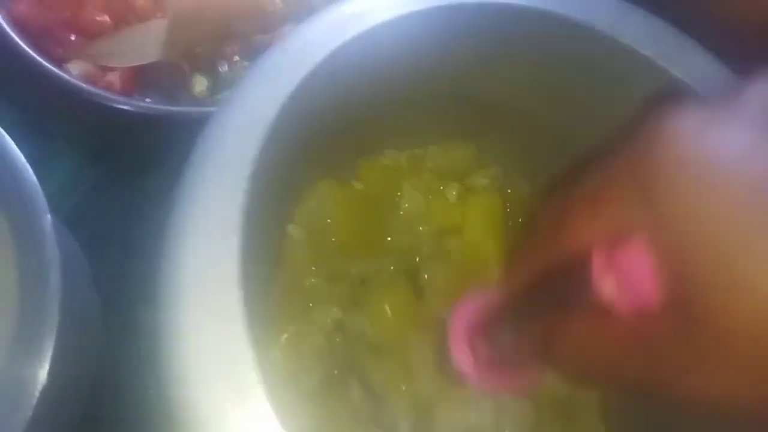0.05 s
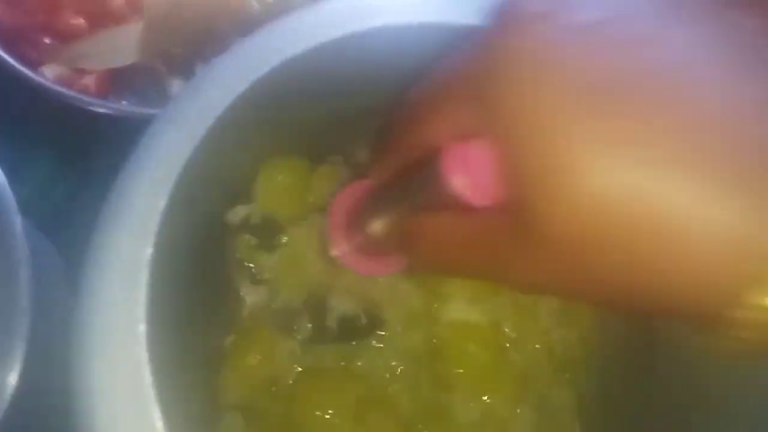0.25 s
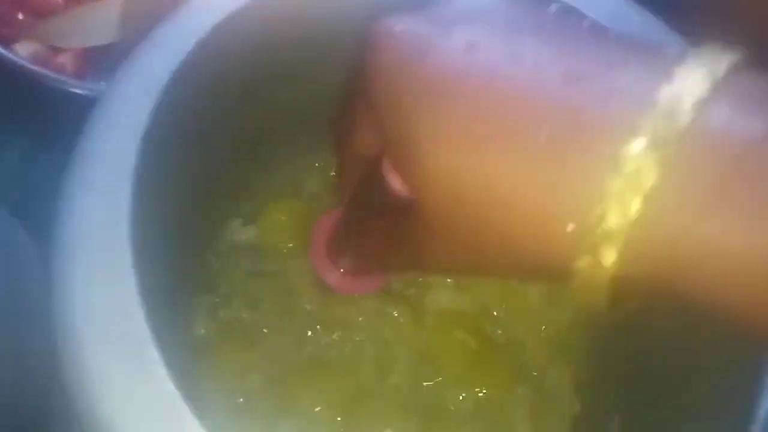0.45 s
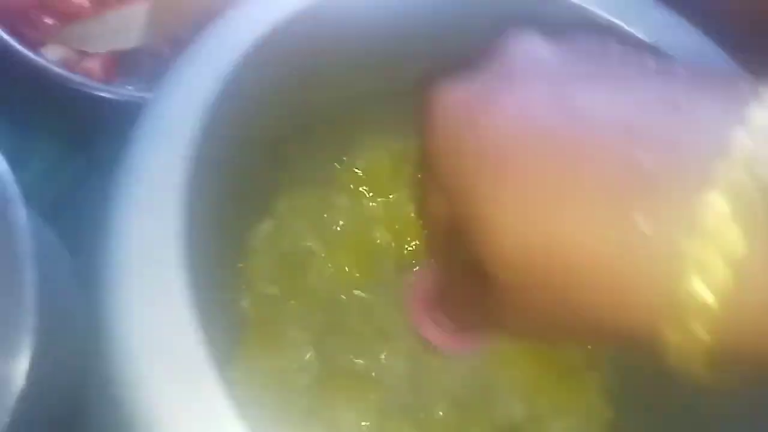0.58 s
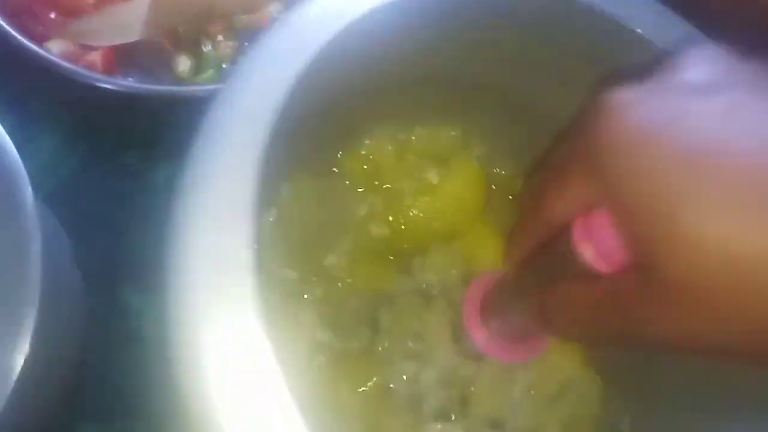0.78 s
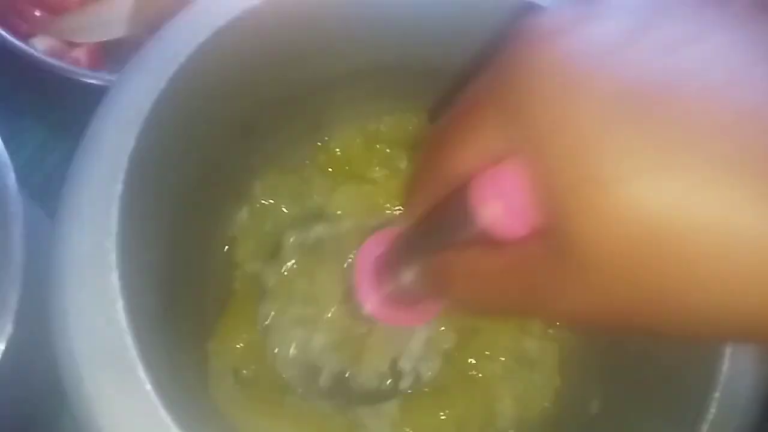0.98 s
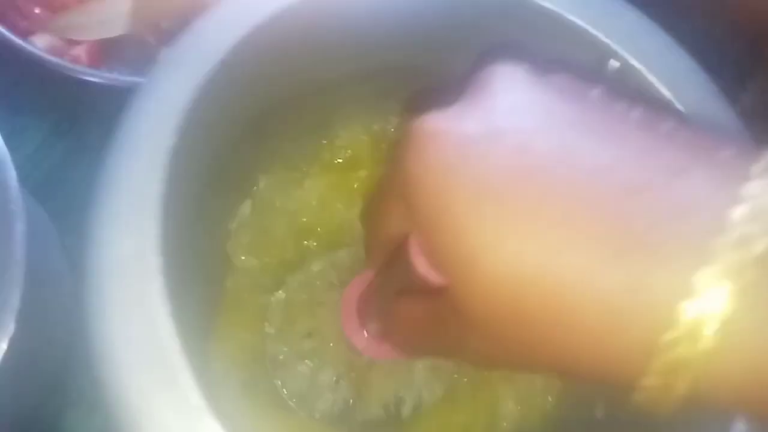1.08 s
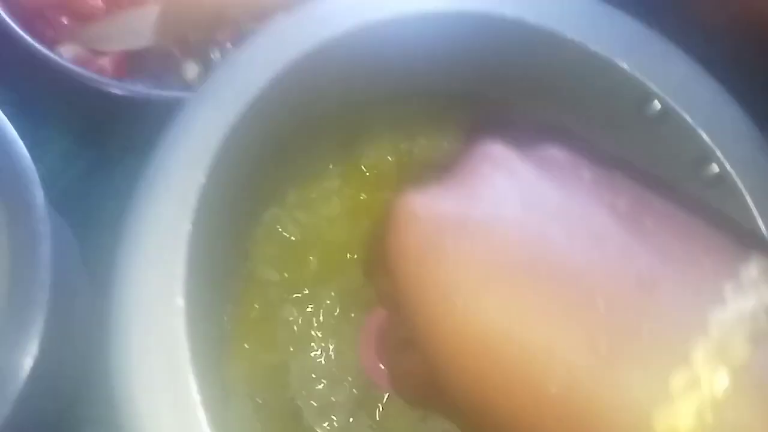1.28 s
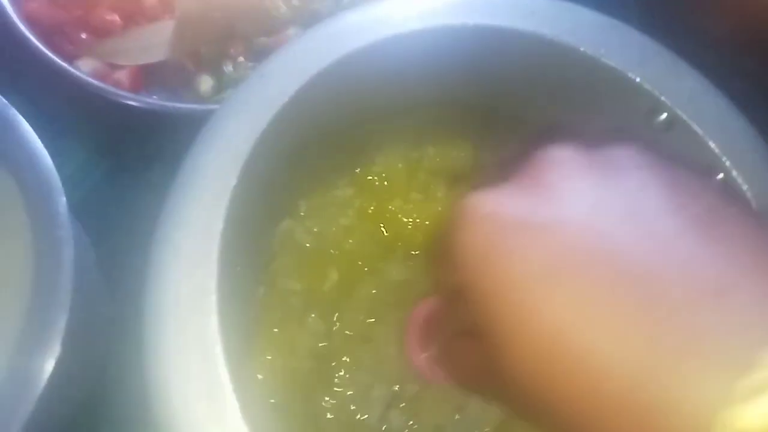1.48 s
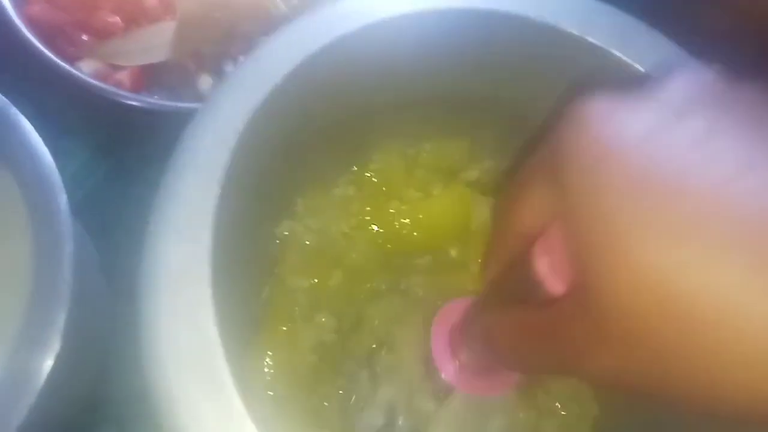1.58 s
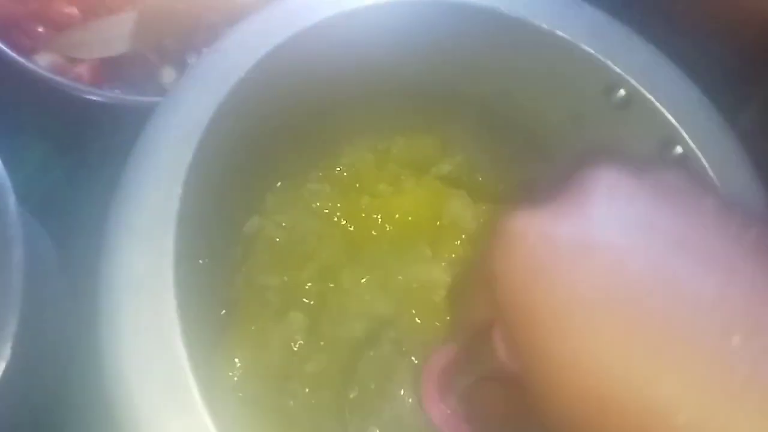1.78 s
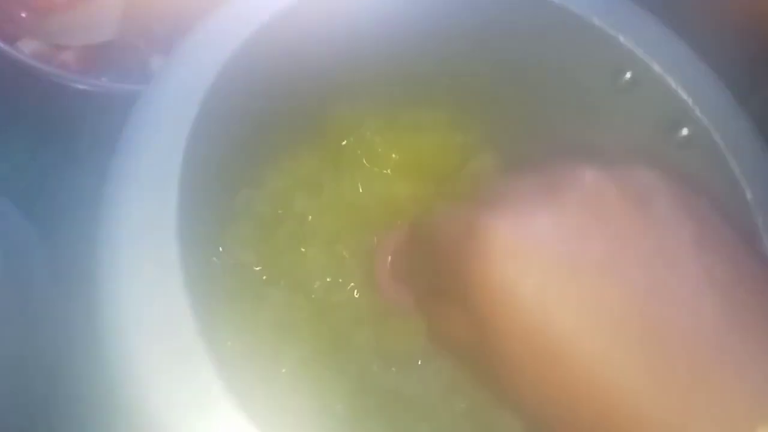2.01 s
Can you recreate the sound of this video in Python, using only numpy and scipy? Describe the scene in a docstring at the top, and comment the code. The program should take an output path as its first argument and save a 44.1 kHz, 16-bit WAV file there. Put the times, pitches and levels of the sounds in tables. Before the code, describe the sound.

A hand masher squelches through soft wet vegetables, knocking and ringing against a metal pot, heard close

```python
"""A hand masher works soft boiled vegetables in a metal pot, heard by a phone held close above it.
Its knocks and wet pops are noise and tone bursts; blows and scrapes drive resonances of the pot wall.
The rim rings on as two beating sines until the mash damps it; hollow notes, chinks and ticks join in.
A sizzling squelch of dense noise grains follows the strokes, over a low kitchen rumble."""
import sys
import numpy as np
from scipy import signal
from scipy.fft import rfft, irfft
from scipy.io import wavfile
from scipy.ndimage import uniform_filter1d

SR = 44100
rng = np.random.default_rng(int(sys.argv[2]) if len(sys.argv) > 2 else 0)


def dump_mix(stems):
    """Bounce the given channels to the path in sys.argv[1] as a 16-bit WAV at rate SR."""
    frames = np.atleast_2d(stems).T  # one column per channel
    limited = np.clip(frames, -1, 1)  # hard clip at full scale
    pcm = np.round(limited * 32767).astype(np.int16)
    wavfile.write(sys.argv[1], SR, pcm)


N = 90404


def undb(db):
    """dB to gain."""
    return 10 ** (np.asarray(db) / 20)


def fall(t, t60_s):
    """Decay by 60 dB in t60_s."""
    return np.exp(-np.log(1000) * np.maximum(t, 0) / max(t60_s, 1e-3))


def unit(x):
    """Scale to rms 1."""
    return x / np.sqrt(np.mean(x ** 2) + 1e-30)


def add(out, x, start_s):
    """Mix x into out at start_s."""
    i = max(int(start_s * SR), 0)
    out[i:i + len(x)] += x[:N - i]


def ring(x, hz, width_hz):
    """Two-pole resonance."""
    r = np.exp(-np.pi * width_hz / SR)
    poles = [1, -2 * r * np.cos(2 * np.pi * hz / SR), r * r]
    return signal.lfilter([1 - r, 0, r - 1], poles, x)


def steep(x, hz, width_hz):
    """Resonance applied twice, rms 1."""
    return unit(ring(ring(x, hz, width_hz), hz, width_hz))


def rough_tone(noise, hz, width_hz, tone_amp):
    """Sine plus narrow noise of rms 1 at the same frequency."""
    t = np.arange(len(noise)) / SR
    return tone_amp * np.sin(2 * np.pi * hz * t) + steep(noise, hz, width_hz)


def colour(x, table):
    """Minimum-phase filter with the gain curve of the table."""
    hz, db = np.array(table).T
    grid = np.log(np.linspace(1, SR / 2, 1025))
    # folding the cepstrum makes the filter causal
    cepstrum = irfft(np.interp(grid, np.log(hz), db) * np.log(10) / 20)
    cepstrum[1:1024] *= 2
    cepstrum[1025:] = 0
    return signal.fftconvolve(x, irfft(np.exp(rfft(cepstrum))))[:len(x)]


def walk(rate_hz):
    """Slewed random levels, rms 1."""
    k = int(SR / rate_hz)
    steps = np.repeat(rng.standard_normal(N // k + 1), k)
    return unit(uniform_filter1d(steps, k)[:N])


def kitchen():
    """Low kitchen rumble: noise through one broad resonance."""
    return undb(-77) * unit(ring(rng.standard_normal(N), 93, 150))


# mash stroke levels: (time [s], bass [dB], mid [dB], treble [dB], top [dB])
# each column acts by its deviation from its mean; the treble mean sets the overall level
SQUELCH_LEVELS = [(0, -41, -43.5, -52.5, -51), (0.069, -111, -51.5, -51.5, -58),
                  (.115, -75, -67.5, -56, -58), (0.151, -99.5, -42, -57, -60), (0.22, -85, -48.5, -56, -53),
                  (0.238, -52, -34.5, -39.5, -51), (.28, -50.5, -45.5, -37, -29.5),
                  (0.341, -75, -37.5, -49.5, -63), (0.392, -87, -55.5, -69, -57),
                  (0.442, -108, -48, -49, -69), (0.489, -90, -59.5, -70, -52),
                  (0.576, -88, -57, -62.5, -59.5), (.62, -60.5, -34.5, -50.5, -68),
                  (0.709, -64.5, -78, -76, -68), (0.748, -68.5, -43, -52.5, -56),
                  (.89, -61, -51.5, -54, -50.5), (0.991, -63, -49, -55, -50),
                  (1.036, -46.5, -47.5, -30.5, -31), (1.131, -62.5, -61, -59.5, -77),
                  (1.27, -93, -72.5, -65, -76), (1.294, -71, -57.5, -49.5, -52),
                  (1.362, -73.5, -62.5, -64, -71), (1.409, -73, -57, -50.5, -47.5),
                  (1.499, -53.5, -45, -51, -55.5), (1.54, -67.5, -47, -56.5, -57),
                  (1.57, -68, -56, -52.5, -45.5), (1.63, -90.5, -51.5, -47, -58),
                  (1.714, -60, -54, -59, -70), (1.747, -46, -37.5, -29.5, -39), (1.8, -70, -46, -46, -53.5),
                  (1.952, -94, -70, -68, -71), (2.001, -72.5, -43, -47.5, -52),
                  (2.05, -83, -54.5, -51, -64)]
# centres of those four columns: (frequency [Hz])
SQUELCH_HZ = (350, 1700, 6200, 12000)
# relative squelch spectrum: (frequency [Hz], density [dB per Hz])
SQUELCH_COLOUR = [(30, -39.5), (120, -22.5), (420, -15.5), (900, -6.5), (1400, -1), (2000, -5.5),
                  (2800, -10), (4200, -12.5), (5200, -1), (6800, 0), (8800, -10.5), (14800, -16.5),
                  (16000, -48)]
GRAINS_PER_S, GRAIN_CYCLES, GRAIN_SPREAD_DB = 550, 9.3, 2.2
FLICKER_DB, FLICKER_RATE_HZ = 2.5, 24.63
VALLEY_HZ, VALLEY_SWING = 3120, 0.67  # levels swing wider around here
BAND_STEP = 0.35  # natural log of frequency, half an octave


def squelch():
    """Dense tiny bursting grains in half-octave bands that follow the strokes and flicker."""
    t, rows, out = np.arange(N) / SR, np.array(SQUELCH_LEVELS), np.zeros(N)
    levels = np.array([np.interp(t, rows[:, 0], rows[:, k]) for k in range(1, 5)])
    deviation = levels - levels.mean(1, keepdims=True)
    spectrum = rfft(unit(colour(rng.standard_normal(N), SQUELCH_COLOUR)))
    log_hz = np.log(np.linspace(1, SR / 2, N // 2 + 1))
    for centre in np.arange(np.log(50), np.log(20000), BAND_STEP):
        band = irfft(spectrum * np.clip(1 - abs(log_hz - centre) / BAND_STEP, 0, 1), N)
        starts = rng.random(N) < GRAINS_PER_S / SR
        grains = starts * undb(GRAIN_SPREAD_DB * rng.exponential(size=N))
        decay = np.exp(-min(np.exp(centre), 3000) / GRAIN_CYCLES / SR)
        grain_env = 0.5 + unit(signal.lfilter([1], [1, -decay], grains))
        swing = 1 + VALLEY_SWING * np.exp(-8 * (centre - np.log(VALLEY_HZ)) ** 2)
        share = np.array([np.interp(centre, np.log(SQUELCH_HZ), e) for e in np.eye(4)])
        level_db = swing * share @ deviation + levels[2].mean()
        out += band * grain_env * undb(level_db + FLICKER_DB * walk(FLICKER_RATE_HZ))
    return out


def notes(table, tone_amp):
    """Short rough notes: narrow noise and a tone under a quick rise and a decay."""
    out, t = np.zeros(N), np.arange(SR // 2) / SR
    noises = rng.standard_normal((len(table), len(t)))
    for (start_s, hz, db, t60_s, width_hz), noise in zip(table, noises):
        env = np.minimum(t / 0.0006, 1) * fall(t, t60_s)
        add(out, undb(db) * env * rough_tone(noise, hz, width_hz, tone_amp), start_s)
    return out


# low pot notes: (time [s], frequency [Hz], level [dB], t60 [s], width [Hz])
HOLLOW_NOTES = [(.001, 418, -46.5, 0.17, 111), (.657, 421.6, -48, 0.2, 50), (.728, 724, -32.5, 0.025, 200),
                (.7425, 750, -26, 0.037, 507), (.7555, 429, -35, 0.15, 50.5),
                (1.0255, 1162, -22.5, 0.044, 120), (1.04, 1159, -39.5, 0.35, 257),
                (1.185, 1990, -66.5, 0.42, 60.4), (1.317, 1314, -52, 0.14, 200),
                (1.403, 1338, -42.5, 0.07, 200), (1.708, 1237, -30, 0.1, 200)]


def hollow():
    """Hollow low notes of the pot, as decaying rough tones."""
    return notes(HOLLOW_NOTES, 0.85)


# knocks and wet pops: (time [s], level [dB], low resonance [Hz], high resonance [Hz],
#   low level [dB], high level [dB], broad crack level [dB], t60 [s])
HIT_EVENTS = [(0.014, -33.5, 1770, 6650, -5, -16, -8, 0.03),
              (0.019, -31, 1830, 4350, -10, -6.5, -40, 0.034),
              (0.037, -32.5, 1410, 5400, -10, -29, -14.5, 0.062),
              (0.1212, -29.5, 1310, 6630, -13, -20, -26, 0.057),
              (0.151, -31, 2010, 6000, -10, -5, -15, 0.025),
              (0.1554, -23.5, 1860, 6960, -4.5, -15.5, -22, 0.021),
              (0.1756, -22, 2157, 5220, -9.5, -13, -12, 0.035),
              (0.205, -21, 1540, 6200, -13.5, -11, -32, 0.021),
              (0.224, -4, 1774, 5970, -7.5, -7, -22, 0.022),
              (0.251, -13.5, 1810, 7400, -6.5, -25, -46, 0.084),
              (0.275, -15, 2510, 5530, -19, -17, -35, 0.11), (0.546, -32.5, 717, 1680, -3, -20, -26, 0.026),
              (0.583, -21.5, 1133, 5560, -15, -6, -11.5, 0.048),
              (0.61, -19, 1557, 5550, -11.5, -10.5, -9, 0.041),
              (0.659, -32, 1915, 5740, -11.5, -11, -12.5, 0.035),
              (0.727, -24.5, 1810, 6100, -11, -29, -30, 0.055),
              (0.742, -18, 1600, 5900, -15, -17.5, -9.5, 0.029),
              (0.795, -25.5, 1340, 6150, -10, -10, -28, 0.017),
              (0.816, -33, 1325, 6440, -10, -4.5, -8, 0.035),
              (0.845, -27.5, 1790, 6340, -4, -37, -20, 0.017),
              (0.851, -25, 1360, 6230, -18, -9, -18.5, 0.036),
              (0.894, -25.5, 1796, 6550, -14, -11, -27, 0.043),
              (0.933, -27, 1800, 6990, -22, -2.5, -23, 0.014),
              (0.985, -29, 1060, 5250, -20.5, -10, -13.5, 0.16),
              (0.999, -16.5, 1780, 5270, -16, -16.5, -19, 0.047),
              (1.011, -6, 1740, 5130, -9.5, -6.5, -15, 0.013),
              (1.018, -9.5, 1650, 9700, -19, -9, -21, 0.016),
              (1.026, -4.5, 1256, 6240, -17, -5.5, -21, 0.023),
              (1.041, -7.5, 1217, 6270, -29, -17.5, -36, 0.017),
              (1.402, -25.5, 1360, 6050, -27, -21.5, -38, 0.035),
              (1.502, -21, 1515, 5600, -10.5, -22.5, -8, 0.027),
              (1.699, -3.5, 1995, 6170, -15, -9.5, -13.5, 0.039),
              (1.733, -12.5, 2780, 7220, -46, -8, -8, 0.042),
              (1.743, -19.5, 1288, 6550, -15.5, -32, -21.5, 0.16),
              (1.753, -17.5, 800, 5360, -40, -2.5, -29, 0.039),
              (1.899, -44, 883, 6650, -14, -6.5, -9.5, 0.091),
              (1.989, -39.5, 794, 5810, -16, -2.5, -36.5, 0.098)]
# relative crack spectrum: (frequency [Hz], density [dB per Hz])
CRACK_COLOUR = [(24, -67.5), (40, -35), (715, -24), (1150, 11.5), (1900, -9.5), (2500, 13.5), (3140, 11.5),
                (4030, 10), (6490, 5.5), (7730, -6.5), (11600, -9.5), (16000, -51)]
LOW_WIDTH_HZ, HIGH_WIDTH_HZ, HIT_TONE_AMP = 760, 1870, 1.1
HIT_ATTACK_S, TAIL_DB, TAIL_T60_S = 0.0019, -27, 0.3


def hits():
    """Knocks and wet pops: two rough resonances and a broad crack, with a faint tail."""
    out, t = np.zeros(N), np.arange(SR // 5) / SR
    noises = rng.standard_normal((len(HIT_EVENTS), len(t)))
    for (start_s, db, lo_hz, hi_hz, lo_db, hi_db, crack_db, t60_s), noise in zip(HIT_EVENTS, noises):
        decay = fall(t, t60_s) + undb(TAIL_DB) * fall(t, TAIL_T60_S)
        env = np.minimum(t / HIT_ATTACK_S, 1) * decay
        low = undb(lo_db) * rough_tone(noise, lo_hz, LOW_WIDTH_HZ, HIT_TONE_AMP)
        high = undb(hi_db) * rough_tone(noise, hi_hz, HIGH_WIDTH_HZ, HIT_TONE_AMP)
        crack = undb(crack_db) * unit(colour(noise, CRACK_COLOUR))
        add(out, undb(db) * env * (low + high + crack), start_s)
    return out


# sharp bright ticks: (time [s], level [dB])
TICK_EVENTS = [(.107, -48), (0.126, -36), (.266, -13.5), (.277, -12.5), (0.743, -59), (0.899, -33),
               (1.002, -12), (1.017, -11.5), (1.502, -34), (1.744, -12)]
TICK_T60_S, TICK_BAND_HZ = 0.007, (2200, 12000)


def ticks():
    """Millisecond snaps of bursting skins and metal contact: decaying band-passed noise."""
    out, t = np.zeros(N), np.arange(SR // 50) / SR
    b, a = signal.butter(2, TICK_BAND_HZ, "band", fs=SR)
    noises = rng.standard_normal((len(TICK_EVENTS), len(t)))
    for (start_s, db), noise in zip(TICK_EVENTS, noises):
        add(out, undb(db) * fall(t, TICK_T60_S) * signal.lfilter(b, a, noise), start_s)
    return out


# blows that reach the metal: (time [s], level [dB], scrape length [s],
#   scrape level before a 20 dB cut [dB], share of free ring time [0-1], tilt [dB per octave])
BLOWS = [(0.2245, -9, .1, -11.5, 0.79, 0), (1.029, -20.5, 0.033, -23.5, 0.13, -5.5),
         (1.6984, -9.5, 0.042, -8.5, 0.32, 4)]
# pot wall modes, one entry each: (frequency [Hz]), (free t60 [s]), (level [dB])
WALL_HZ = (1395, 1515, 1648, 1836, 2030, 2509, 2859, 3855, 5448, 5701, 6025, 6550, 7170, 8290)
WALL_T60_S = (.11, .1, .12, .14, .11, .24, .24, .1, .09, .09, .09, .1, .09, .07)
WALL_DB = (-3, -3, -2, 0, -2, -3, -2, -12, -4, -6, -5, -2, -5, -6)
BLOW_T60_S, SCRAPE_SCATTER_DB, SCRAPE_SCATTER_RATE_HZ = 0.016, 3.5, 250


def pot_wall():
    """Blows and the scrapes after them drive the wall modes, each blow with its own ring time."""
    out, t = np.zeros(N), np.arange(N) / SR
    noises = rng.standard_normal((len(BLOWS), N))
    for (start_s, db, length_s, scrape_db, free, tilt_db), noise in zip(BLOWS, noises):
        since = t - start_s
        blow = undb(db) * noise * (since > 0) * fall(since, BLOW_T60_S)
        scrape_env = np.sin(np.pi * np.clip(since / length_s, 0, 1) ** 1.2)
        scatter_db = SCRAPE_SCATTER_DB * walk(SCRAPE_SCATTER_RATE_HZ)
        scrape = undb(scrape_db + scatter_db) / 10 * noise * scrape_env
        for hz, mode_db, t60_s in zip(WALL_HZ, WALL_DB, WALL_T60_S):
            width_hz = np.log(1000) / np.pi / (t60_s * min(free, 1))
            gain = undb(mode_db + tilt_db * np.log2(hz / 3000)) * SR / 200 / width_hz
            out += gain * ring(blow + scrape, hz, width_hz)
    return out


# rim rings: (start time [s], damping time [s], lower mode level [dB], upper mode level [dB])
RIM_RINGS = [(.225, 0.564, -30, -42), (1.693, 2.1, -34.5, -29.5)]
RIM_HZ, RIM_T60_S = (813.5, 881), (0.92, 0.81)
RIM_RISE_S, RIM_DAMP_T60_S = 0.09, 0.02


def rim():
    """The ring of two close rim modes comes up gradually, beats and decays until the mash damps it."""
    out, t = np.zeros(N), np.arange(N) / SR
    for start_s, damped_s, *levels_db in RIM_RINGS:
        since = t - start_s
        rise = 1 - np.exp(-np.maximum(since, 0) / RIM_RISE_S)
        env = rise * fall(t - damped_s, RIM_DAMP_T60_S)
        for hz, db, t60_s in zip(RIM_HZ, levels_db, RIM_T60_S):
            out += undb(db) * env * fall(since, t60_s) * np.sin(2 * np.pi * hz * since)
    return out


# small bright chinks: (time [s], frequency [Hz], level [dB], t60 [s], width [Hz])
CHINK_NOTES = [(1.288, 9320, -46, 0.28, 347), (1.29, 14770, -49.5, 0.17, 350),
               (1.29, 13100, -53.5, 0.17, 348)]


def chinks():
    """Small bright chinks, as high decaying rough tones."""
    return notes(CHINK_NOTES, 0.54)


def scene():
    """All sources summed at the microphone."""
    rumble = kitchen()
    strikes = hits() + ticks() + pot_wall() + rim()
    return (rumble + strikes + hollow() + chinks() + squelch())[None]


def record(dry):
    """The phone cuts the deep bass and the top."""
    high_pass = signal.butter(2, 38, "high", fs=SR, output="sos")
    low_pass = signal.ellip(8, 0.2, 70, 15700, fs=SR, output="sos")
    return signal.sosfilt(low_pass, signal.sosfilt(high_pass, dry))


dry = scene()
out = record(dry)
dump_mix(out)
```